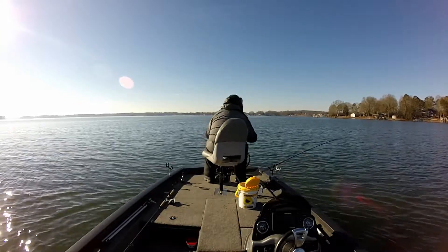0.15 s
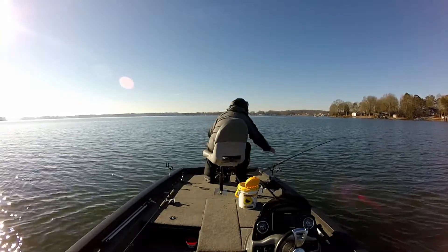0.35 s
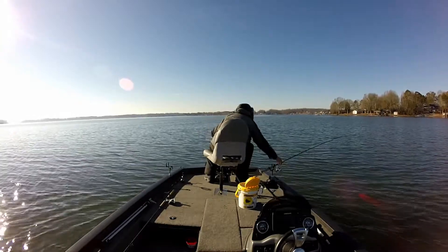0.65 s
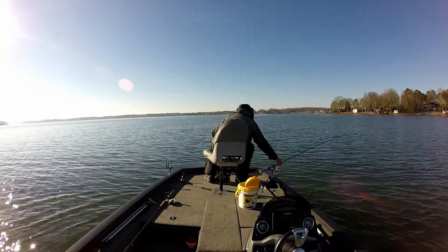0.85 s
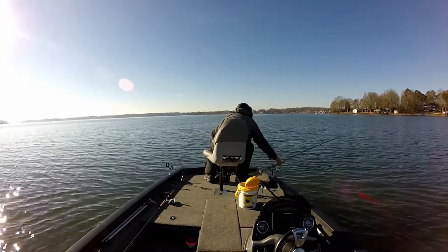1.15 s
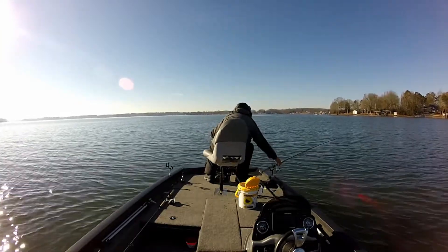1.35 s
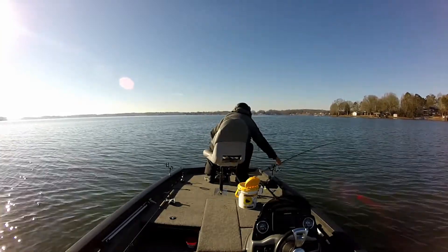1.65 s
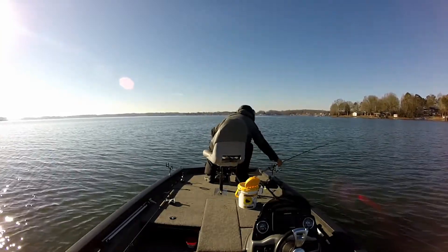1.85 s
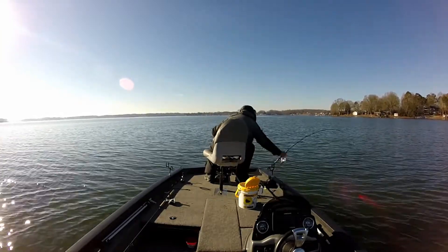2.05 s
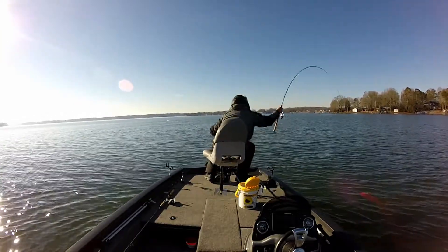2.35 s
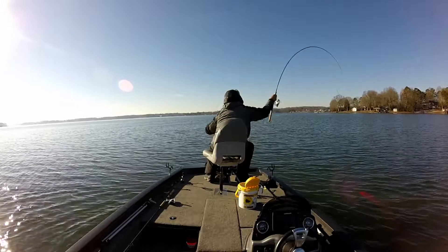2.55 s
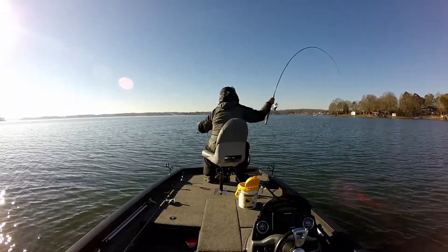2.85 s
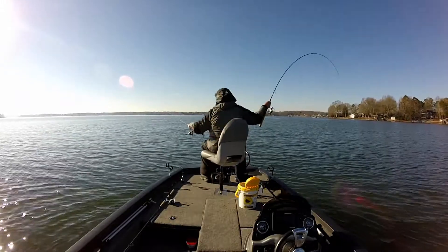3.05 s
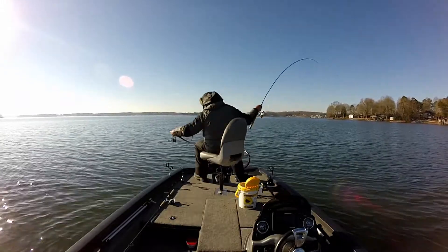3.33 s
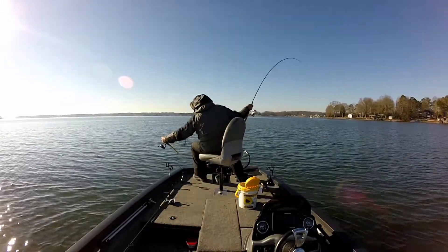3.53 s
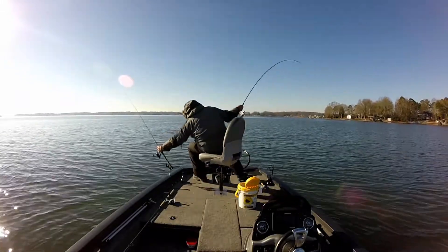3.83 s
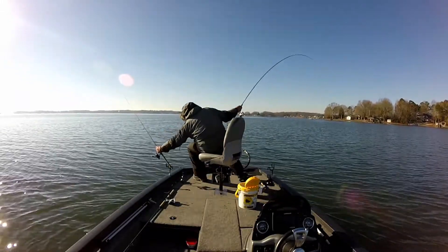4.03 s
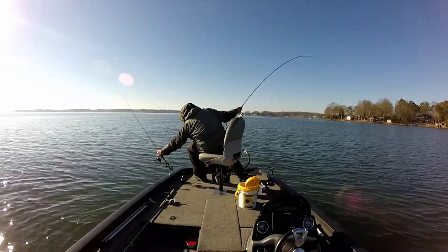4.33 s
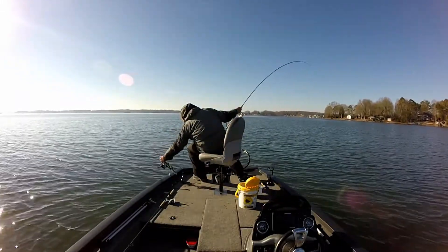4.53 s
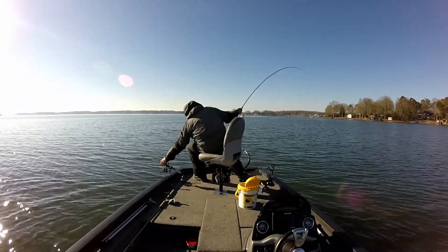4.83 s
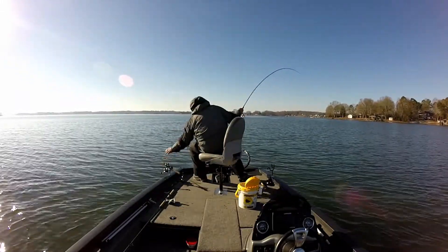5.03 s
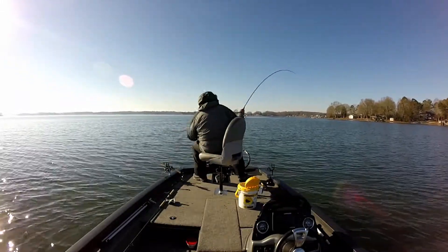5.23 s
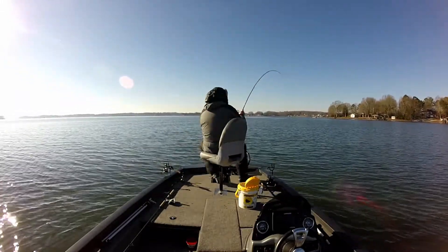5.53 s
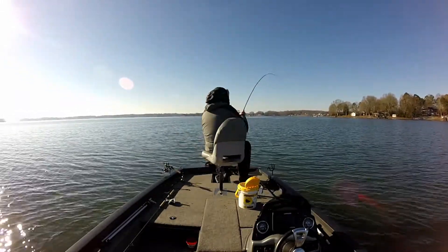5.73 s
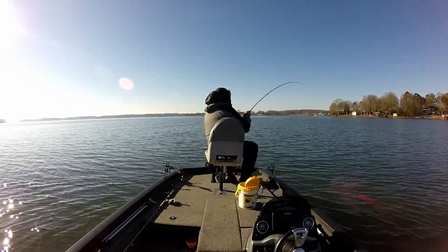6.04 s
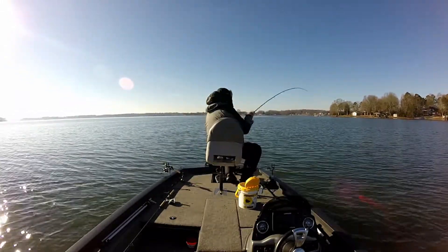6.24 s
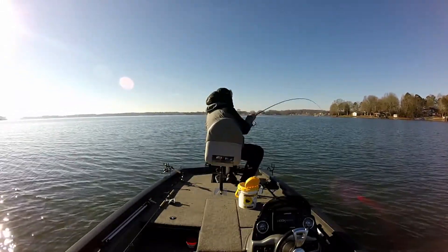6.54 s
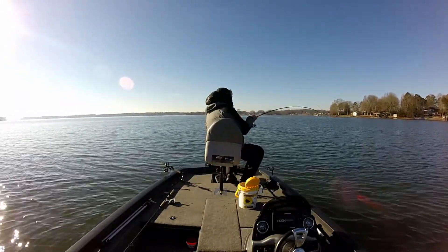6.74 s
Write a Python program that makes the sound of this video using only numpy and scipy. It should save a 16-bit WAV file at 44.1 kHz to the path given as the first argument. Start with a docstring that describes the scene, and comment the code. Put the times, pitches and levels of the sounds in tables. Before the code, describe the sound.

On an open boat, light slaps and drips of lake water run throughout, with a small pump buzzing faintly under the deck. A fishing rod scrapes out of its holder and makes the hull boom, and the reel ticks and jingles faintly. After one more knock, a second rod clatters into a holder, and then the lapping carries on. A microphone inside a closed housing makes everything slightly muffled.

```python
"""Small waves lap against the hull of an open fishing boat on a calm lake, exciting trapped air pockets.
A rod is dragged out of its holder and another is knocked down into one: friction and impact drive the
hull's modes, which boom. Reel hardware rings and ticks faintly, with a thin sizzle far above. A small
pump buzzes under the deck, its ticks resonating in its casing, over a steady wash of water and air.
One microphone inside a closed housing hears it all, hence dull and mono."""
import sys
import numpy as np
from scipy import signal
from scipy.fft import rfft, irfft
from scipy.io import wavfile
from scipy.ndimage import uniform_filter1d

SR = 44100
rng = np.random.default_rng(int(sys.argv[2]) if len(sys.argv) > 2 else 0)


def inscribe(sig):
    """Save sig as 16-bit PCM at rate SR to the path in sys.argv[1].

    A 1-D sig is mono; a 2-D sig holds one channel per row.
    Samples are clipped to [-1, 1] before scaling.
    """
    pcm = np.round(np.clip(np.atleast_2d(sig).T, -1, 1) * 32767)
    wavfile.write(sys.argv[1], SR, pcm.astype(np.int16))


N = 303408

# normal modes of hull and holder: f/Hz, gain/dB, T60/s
HULL_MODES = [(172.1, -1.5, 1), (204.2, 2.5, 0.15), (256, 1, 0.078), (267.5, -2.5, 0.12), (343.4, 2, 0.087),
              (374, -3.5, 0.064), (401, -5.5, 0.19), (470, -4.5, 0.16), (566, 3.5, 0.11), (635, 7, 0.047),
              (780, -1, 0.13), (888, -3, 0.022), (1160, -4, 0.056), (1216, -2, 0.028), (1370, -3.5, 0.063),
              (1470, -3.5, 0.028), (1735, -7.5, 0.1), (1820, -0.5, 0.04), (2110, -0.5, 0.029),
              (2280, 3, 0.026), (2380, -5, 0.017), (2860, 4.5, 0.016), (3150, -1, 0.042), (3240, -7, 0.1),
              (3340, 0, 0.07), (4800, 3, 0.05)]
# impacts on the hull: t/s, deck level/dB, boom level/dB, boom f/Hz, boom spread/octaves,
# clack level/dB, clack f/Hz, clack spread/octaves, crack level/dB
HULL_IMPACTS = [(2.006, -56, -35.5, 383, 0.33, -50, 1280, 0.6, -47),
                (2.041, -68, -40, 300, 1.08, -57, 1200, 0.93, -69),
                (2.097, -68, -29, 352, 0.44, -59, 1160, .4, -78),
                (2.124, -59, -34, 348, 0.11, -46, 785, .4, -48),
                (2.148, -67, -31, 340, 0.18, -56, 785, 0.25, -80),
                (2.163, -46.5, -35, 342, 0.21, -29.5, 1250, 0.33, -41),
                (2.206, -40, -44, 357, .3, -54, 1420, 0.77, -74),
                (2.566, -46, -37, 214, 0.2, -65, 1200, 0.64, -72),
                (2.625, -61, -50, 290, 0.28, -59, 1200, 0.98, -72),
                (3.968, -69, -29, 424, 0.2, -41, 1060, 0.45, -80),
                (4.038, -70, -65, 400, 0.55, -59, 2100, 1.1, -49),
                (4.697, -57, -43.5, 474, 0.48, -50, 1200, 0.46, -50),
                (4.724, -47, -32.5, 513, 0.86, -35.5, 1650, 0.73, -55),
                (4.799, -44, -34, 302, 1.6, -28.5, 1590, 0.5, -43),
                (4.838, -55, -36.5, 620, 0.45, -38.5, 1600, 0.52, -60),
                (5.843, -51, -73, 300, .5, -82, 1200, .8, -75)]


def lapping_waves():
    """Bubble resonance: each slap sets a trapped air pocket ringing and throws water, heard as noise."""
    # t/s, duration/s, pocket f/Hz, pocket level/dB, thrown water level/dB
    laps = [(0.062, 0.11, 1740, -71, -61), (0.127, 0.054, 940, -53, -65), (0.191, 0.014, 577, -58, -66),
            (0.341, 0.032, 400, -52.5, -67), (0.668, 0.04, 1940, -61.5, -73), (0.698, 0.04, 1150, -70, -53),
            (0.736, 0.041, 935, -57, -51.5), (0.77, 0.064, 686, -54.5, -68),
            (0.831, 0.0078, 707, -43.5, -57), (0.84, 0.035, 770, -58, -53.5), (1.089, 0.01, 905, -58, -70),
            (1.14, 0.03, 1260, -46, -79), (1.167, 0.028, 1120, -50, -52), (1.536, 0.015, 288, -45.5, -58),
            (1.58, 0.09, 360, -54.5, -85), (1.688, 0.017, 1630, -53.5, -63), (1.756, 0.032, 935, -55, -75),
            (1.784, 0.028, 417, -43.5, -51), (1.845, 0.034, 530, -56, -64), (2.817, 0.017, 563, -56.5, -67),
            (3.05, 0.018, 1030, -55, -53), (3.295, 0.029, 407, -42, -60), (3.302, 0.025, 1510, -60, -72),
            (3.341, 0.04, 433, -49, -57), (3.352, 0.024, 1520, -56.5, -78), (3.43, 0.038, 1180, -58.5, -68),
            (3.623, 0.016, 2450, -61, -69), (3.658, 0.012, 1730, -55, -62), (3.851, 0.034, 786, -58.5, -62),
            (3.97, 0.053, 422, -44, -61), (3.971, 0.014, 2230, -53, -78), (4.035, 0.046, 940, -54, -57),
            (4.25, 0.016, 308, -47, -72), (4.258, 0.042, 308, -54.5, -90),
            (4.387, 0.031, 368, -46.5, -57.5), (4.417, 0.11, 760, -59.5, -80),
            (4.424, 0.028, 297, -53.5, -73), (4.433, 0.045, 624, -55, -72), (4.52, 0.044, 753, -57, -74),
            (4.898, 0.098, 423, -52.5, -61.5), (5.076, 0.025, 463, -49.5, -58),
            (5.105, 0.058, 394, -55, -77), (5.259, 0.032, 476, -53, -62), (5.282, 0.044, 462, -52.5, -61),
            (5.487, 0.0093, 1290, -48.5, -61), (5.498, 0.026, 1070, -53.5, -62),
            (5.617, 0.04, 554, -45, -52.5), (5.883, 0.026, 1920, -59, -61), (5.948, 0.031, 1480, -61, -53),
            (5.982, 0.03, 400, -47.5, -47), (5.945, 0.073, 3220, -68.5, -70), (6.022, 0.046, 434, -52, -62),
            (6.092, 0.022, 1260, -62, -62), (6.242, 0.024, 465, -49.5, -57), (6.253, 0.01, 1090, -50, -53),
            (6.264, 0.0089, 995, -51, -46), (6.276, 0.031, 1170, -48, -52.5), (6.263, 0.03, 3080, -65, -85),
            (6.319, 0.0063, 1190, -47, -54), (6.327, 0.045, 1060, -52, -59),
            (6.408, 0.019, 1190, -58, -53.5), (6.624, 0.045, 1060, -55.5, -56),
            (6.67, 0.032, 440, -42.5, -52.5), (6.673, 0.017, 1610, -53.5, -77),
            (6.702, 0.029, 444, -51, -78)]
    # slosh, splash, spray: low f/Hz, high f/Hz, gain/dB for a 600 Hz pocket, slope/(dB per pocket octave)
    water_bands = [(222, 804, 2, -4.5), (810, 1490, -6, 5), (1840, 4300, -23, 1)]
    broad_low_hz, broad_high_hz, broad_min_s = 850, 1480, .013
    pockets, envelopes = np.zeros(N), np.zeros((3, N))
    drops = rng.standard_normal(N) * from_db(2 * drift(130))  # water lands unevenly
    for start, length, hz, pocket_db, water_db in laps:
        push = stroke(.7 * length, rise=.003, fall=.005)
        noise = drops[round(start * SR):][:len(push)]
        t = np.arange(len(noise)) / SR
        # longer mid-pitched laps sound broad and splashy; higher ones ring as clear drips
        is_broad = broad_low_hz < hz < broad_high_hz and length > broad_min_s
        sag, ring_share = (1, .4) if is_broad else (.4, 1)
        force = noise * push[:len(t)] * np.exp(-sag * t / length)
        force[0] = 12 * np.std(noise)  # first impact of the slap
        pocket = resonator(force, hz, t60=26 * ring_share / hz)
        pocket = resonator(pocket, hz, t60=3.6 * ring_share / hz)  # steepens the skirts
        pocket *= np.clip(t / .005, 0, 1)  # water meets the hull softly
        pocket_rms = np.sqrt(np.mean(pocket[:round(length * SR)] ** 2))
        add(pockets, start, from_db(pocket_db) * pocket / pocket_rms)
        octaves = np.log2(hz / 600)  # smaller pockets splash brighter
        throw = stroke(length, rise=.007, fall=.011)
        for envelope, (_, _, db, slope) in zip(envelopes, water_bands):
            add(envelope, start, from_db(water_db + db + slope * octaves) * throw)
    thrown_water = sum(band(envelope * drops, low, high) / np.std(band(drops, low, high))
                       for envelope, (low, high, _, _) in zip(envelopes, water_bands))
    return pockets + thrown_water


def hull_knocks():
    """Modal superposition: an impact excites every hull mode, favouring those near its boom and clack."""
    t, out = np.arange(round(.016 * SR)) / SR, np.zeros(N)
    scatter_db = rng.normal(0, 2.5, (len(HULL_IMPACTS), len(HULL_MODES)))
    phases = rng.uniform(0, 2 * np.pi, scatter_db.shape)
    for k, (hz, mode_db, t60) in enumerate(HULL_MODES):
        push = t * np.exp(-t / (.0012 + .28 / hz))  # low modes take longer to get going
        force = np.zeros(N)
        for impact, chance_db, phase in zip(HULL_IMPACTS, scatter_db[:, k], phases[:, k]):
            start, deck_db, boom_db, boom_hz, boom_spread, clack_db, clack_hz, clack_spread, _ = impact
            boom_db -= 6 * (np.log2(hz / boom_hz) / boom_spread) ** 2
            clack_db -= 6 * (np.log2(hz / clack_hz) / clack_spread) ** 2
            db = deck_db if hz < 190 else boom_db if hz < 700 else clack_db
            drive = 2 * push / push.sum() * np.cos(2 * np.pi * hz * t + phase)
            add(force, start, from_db(db + chance_db) * drive)
        out += from_db(mode_db) * resonator(force, hz, t60)
    return out


def contact_cracks():
    """Impact transient: the hard first contact of a knock is brief, so its spectrum is broad and bright."""
    t, out = np.arange(round(.03 * SR)) / SR, np.zeros(N)
    envelope = np.clip(t / .0017, 0, 1) * np.exp(-t / .0085)
    for start, *_, crack_db in HULL_IMPACTS:
        add(out, start, from_db(crack_db) * envelope * rng.standard_normal(len(t)))
    return band(band(out, 1700, 5400), 1700, 5400)


def rod_friction():
    """Forced vibration: a rod butt rubbing in its holder drives the modes near two moving frequencies."""
    # one curve per rub: t/s, boom level/dB, boom f/Hz, rasp level/dB, rasp f/Hz
    rubs = [
        [(1.99, -79, 340, -71, 1250), (2.004, -48, 350, -62, 1200), (2.065, -34, 292, -50, 1170),
         (2.082, -26.5, 264, -49, 1160), (2.091, -27, 300, -51, 1160), (2.1, -25, 350, -49, 1160),
         (2.106, -27, 345, -52, 1150), (2.129, -20, 359, -44, 810), (2.14, -26, 349, -41, 755),
         (2.149, -37, 348, -37.5, 775), (2.157, -22, 345, -41.5, 775), (2.171, -27.5, 336, -39, 1220),
         (2.186, -24.5, 335, -45, 1200), (2.197, -43, 342, -48, 1200), (2.214, -32, 345, -44, 1420),
         (2.238, -44.5, 340, -55, 1350), (2.3, -58, 300, -75, 1200)],
        [(2.55, -68, 235, -77, 1135), (2.572, -44.5, 241, -68, 1150), (2.618, -46, 254, -76, 1150),
         (2.634, -39, 260, -67, 1134), (2.74, -57, 262, -78, 1150)],
        [(4.64, -54, 279, -58, 1150), (4.69, -53, 346, -69, 1140), (4.708, -33.5, 375, -48, 1150),
         (4.72, -42, 330, -47, 1150), (4.732, -27, 330, -40, 1120), (4.748, -33.5, 348, -44, 1150),
         (4.768, -33, 360, -55, 1150), (4.775, -53, 356, -56, 1150), (4.795, -44, 356, -59, 1150),
         (4.804, -23, 345, -36, 990), (4.813, -29.5, 345, -37, 1000), (4.819, -37, 327, -45, 910),
         (4.846, -33, 323, -43.5, 810), (4.862, -46, 328, -53, 810), (4.869, -48, 298, -56, 810),
         (4.9, -49, 280, -56, 810)],
    ]
    out = np.zeros(N)
    for rub in rubs:
        span = slice(round(rub[0][0] * SR), round(rub[-1][0] * SR))
        boom_db, boom_hz, rasp_db, rasp_hz = (curve[span] for curve in curves(rub))
        slips = rng.standard_normal((2, len(boom_db)))
        motion = np.zeros_like(slips)
        for k, (hz, mode_db, t60) in enumerate(HULL_MODES[1:]):
            is_rasp = int(hz > 700)
            detuning_db = -120 * np.log2(hz / (rasp_hz if is_rasp else boom_hz)) ** 2
            motion[is_rasp] += resonator(slips[k % 2] * from_db(mode_db + detuning_db), hz, 1.83 * t60)
        running_rms = np.sqrt(uniform_filter1d(motion ** 2, size=800) + 1e-12)
        boom, rasp = motion / running_rms  # the hand alone sets the level
        scrape = from_db(rasp_db - 16) * unit_rms(band(slips[0], 1600, 2580))
        out[span] = band(from_db(boom_db) * boom, 126, 634) + band(from_db(rasp_db) * rasp, 600, 2800)
        out[span] += scrape
    return out


def reel_jingle():
    """Resonance: a loose metal part of the reel rings with one wavering note at each shake of the rod."""
    # t/s, duration/s, level/dB
    shakes = [(2.395, 0.038, -79), (2.45, 0.011, -75), (2.474, 0.043, -66), (2.56, .055, -72),
              (2.655, 0.06, -71), (2.765, .05, -73.5), (2.823, 0.033, -77), (2.985, .01, -72),
              (3.045, .035, -78), (3.138, .028, -72), (3.25, .05, -83), (6.635, 0.13, -76),
              (6.687, .03, -71)]
    note_hz, rise_db_per_s, fall_db_per_s = 4843, 1200, 450
    t, envelope = np.arange(N) / SR, np.zeros(N)
    for start, length, db in shakes:
        ramp_db = np.minimum(rise_db_per_s * (t - start), fall_db_per_s * (start + length - t))
        envelope = np.maximum(envelope, from_db(db + np.minimum(0, ramp_db)))
    note = np.sqrt(2) * np.sin(2 * np.pi * note_hz * t + .4 * drift(45))
    return envelope * note * from_db(2.5 * drift(40))


def reel_ticks():
    """Damped transients: each tick of the reel is a bright noise burst that decays exponentially."""
    # t/s, level/dB before filtering
    ticks = [(2.006, -47), (2.474, -56), (2.5177, -56), (2.594, -54), (2.6544, -55), (2.859, -60),
             (2.92, -63), (2.9836, -55), (3.054, -58), (3.1363, -55), (3.255, -53), (3.515, -56)]
    t, out = np.arange(round(.02 * SR)) / SR, np.zeros(N)
    for start, db in ticks:
        add(out, start, from_db(db) * rng.standard_normal(len(t)) * np.exp(-t / .0023))
    return band(out, 3400, 9300)


def sizzle():
    """Amplitude modulation: narrow-band noise near the top of hearing comes in short, thin bursts."""
    # t/s, duration/s, level/dB
    bursts = [(2.398, .028, -86), (2.437, 0.088, -84), (2.587, .035, -84), (2.695, .052, -86),
              (2.768, .038, -81), (2.81, .072, -83), (2.906, 0.023, -83), (3.035, .034, -86),
              (3.12, 0.032, -83), (3.235, .046, -83), (3.422, .03, -88), (3.503, .036, -82),
              (5.955, .03, -85), (6.063, 0.036, -77), (6.31, .04, -80), (6.55, .045, -82),
              (6.645, .03, -84), (6.745, .045, -83)]
    edges_hz = 14880, 15080
    envelope = np.zeros(N)
    for start, length, db in bursts:
        add(envelope, start, from_db(db) * stroke(length, rise=.008, fall=.004))
    hiss = band(band(rng.standard_normal(N), *edges_hz), *edges_hz)
    return envelope * unit_rms(hiss)


def pump():
    """Periodic impulse excitation: three uneven ticks a turn ring the modes of the pump casing."""
    # shaft speed: t/s, rotation f/Hz
    speed = [(0, 34.38), (1.5, 34.44), (2.2, 34.31), (3.2, 34.29), (3.8, 34.21), (6.88, 34.23)]
    # ticks within a turn: phase/turns, level/dB
    ticks = [(0, 0), (.37, 0), (.68, -11)]
    # f/Hz, gain/dB, T60/s
    casing_modes = [(1534, 5.5, 0.03), (1740, 11.5, 0.019), (1798, 2, 0.022), (3260, 4.5, 0.01)]
    turns = np.cumsum(curves(speed)[0]) / SR + .51
    force = np.zeros(N)
    for phase, db in ticks:
        count = np.floor(turns - phase)
        force += from_db(db) * np.diff(count, prepend=count[0])
    force *= from_db(1.5 * rng.standard_normal(N))  # no two ticks are equally strong
    buzz = sum(from_db(db) * resonator(force, hz, t60) for hz, db, t60 in casing_modes)
    return from_db(-64.5) * unit_rms(buzz)


def lake_wash():
    """Broadband noise: water and air flicker in third-octave bands; those under 150 Hz follow the swell."""
    # f/Hz, relative spectral density/dB
    spectrum = [(12, -47), (20, -4), (75, -3), (125, -4), (160, -8), (250, -11.5), (450, -18.5),
                (700, -20.5), (1200, -23), (1860, -24), (1900, -25.5), (2080, -31), (2600, -31),
                (3500, -33.5), (10500, -43.5), (13000, -54.5), (15000, -58)]
    # low swell: t/s, level/dB
    swell_levels = [(0, -50), (.6, -51.5), (1.7, -51.5), (1.98, -50), (2.04, -45), (2.2, -48),
                    (3.07, -51.5), (3.93, -52.5), (4.75, -49), (5.15, -46), (5.5, -52.5), (5.92, -52.5),
                    (6.11, -45), (6.22, -53.5), (6.59, -48.5), (6.88, -53)]
    edges_hz = 20 * 2 ** np.arange(0, 9.8, 1 / 3)
    white, parts = rng.standard_normal((2, N)), np.zeros((2, N))
    for k, (low, high) in enumerate(zip(edges_hz, edges_hz[1:])):
        flicker_db = 1.8 if low < 2500 else .9  # steadier in the treble
        parts[int(high > 150)] += from_db(flicker_db * drift(6.8)) * band(white[k % 2], low, high)
    hz, db = np.transpose(spectrum)
    bins_hz = np.fft.rfftfreq(N, 1 / SR)
    colour = from_db(np.interp(np.log(bins_hz + 1), np.log(hz), db))
    swell, wash = irfft(rfft(parts) * colour, N)
    return from_db(curves(swell_levels)[0]) * unit_rms(swell) + from_db(-54.5) * unit_rms(wash)


def resonator(force, hz, t60):
    """Damped harmonic oscillator: a unit impulse starts a decaying sine of amplitude about 1."""
    r, w = from_db(-60 / (max(t60, .002) * SR)), 2 * np.pi * hz / SR
    return signal.lfilter([0, np.sin(w)], [1, -2 * r * np.cos(w), r * r], force + 1e-18)


def drift(hz):
    """Random fluctuation: noise low-passed at hz, with rms about 1."""
    step, settle = 40, 2000
    r = np.exp(-2 * np.pi * hz * step / SR)
    white = rng.standard_normal(N // step + settle + 2)
    slow = signal.lfilter([1], [1, -2 * r, r * r], white)[settle:]
    return np.interp(np.arange(N) / step, np.arange(len(slow)), unit_rms(slow))


def stroke(length, rise, fall):
    """Envelope with linear attack, hold and exponential decay; times in s."""
    t = np.arange(round((length + .06) * SR)) / SR
    return np.clip(t / rise, 0, 1) * np.exp(-np.maximum(t - length, 0) / fall)


def band(x, low_hz, high_hz):
    """Band-pass filter with second-order skirts."""
    return signal.sosfilt(signal.butter(2, [low_hz, high_hz], "band", fs=SR, output="sos"), x)


def curves(rows):
    """Linear interpolation of each column against the first, t/s, at every sample."""
    times, *columns = np.transpose(rows)
    return [np.interp(np.arange(N) / SR, times, column) for column in columns]


def add(out, start, piece):
    """Superpose a short sound from a start time in s."""
    at = round(start * SR)
    out[at:at + len(piece)] += piece[:N - at]


def from_db(db):
    """Level to amplitude ratio."""
    return 10 ** (np.asarray(db) / 20)


def unit_rms(x):
    """Normalise to rms 1."""
    return x / np.sqrt(np.mean(x ** 2) + 1e-20)


def scene():
    """Superposition: all sources sum at one microphone, which feeds both channels."""
    water = lake_wash() + lapping_waves()
    rods = hull_knocks() + contact_cracks() + rod_friction()
    reel = reel_jingle() + reel_ticks()
    return np.tile(water + rods + reel + sizzle() + pump(), (2, 1))


def record(dry):
    """Band limiting: a steep low-pass removes the highest treble."""
    cutoff_hz = 15250
    return signal.sosfilt(signal.ellip(12, .5, 70, cutoff_hz, fs=SR, output="sos"), dry)


dry = scene()
out = record(dry)
inscribe(out)
```